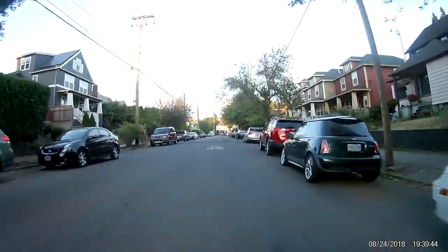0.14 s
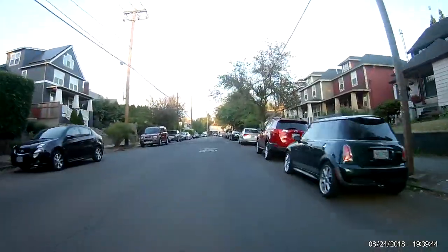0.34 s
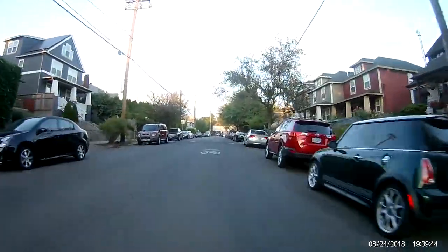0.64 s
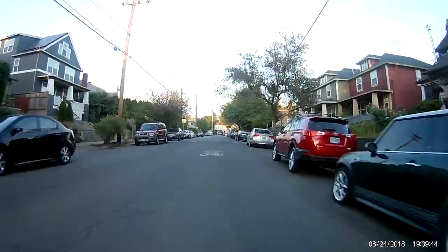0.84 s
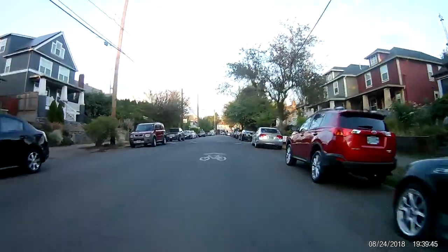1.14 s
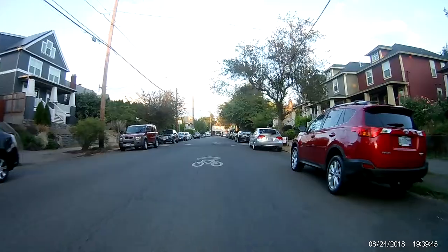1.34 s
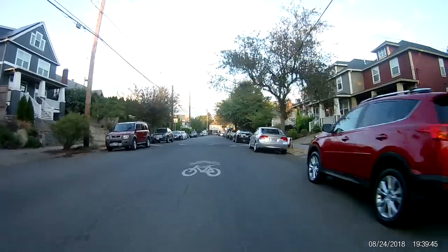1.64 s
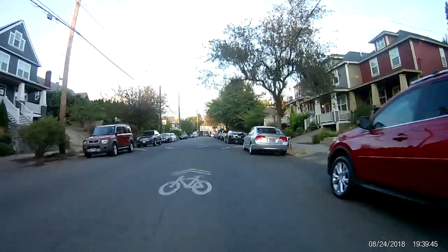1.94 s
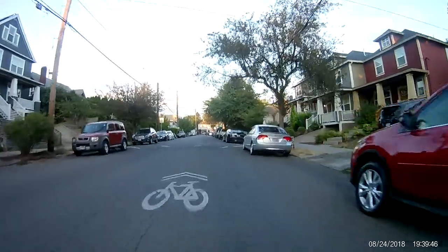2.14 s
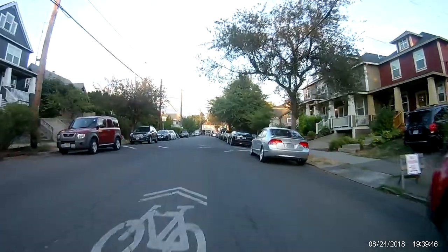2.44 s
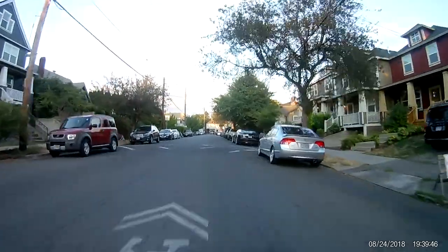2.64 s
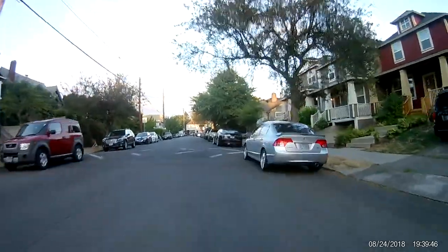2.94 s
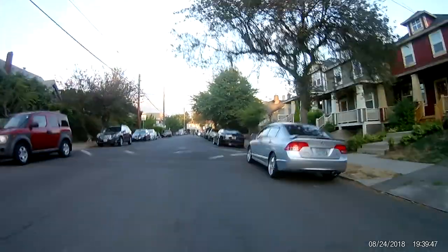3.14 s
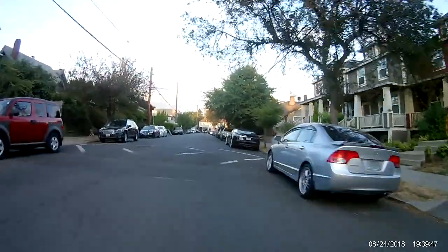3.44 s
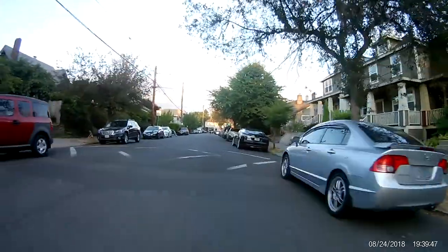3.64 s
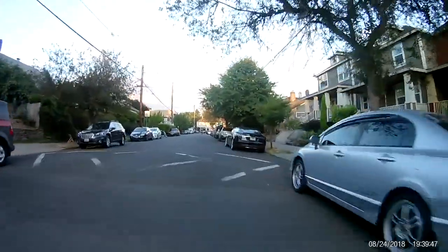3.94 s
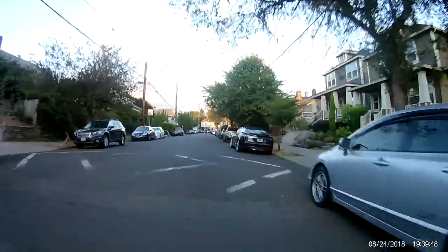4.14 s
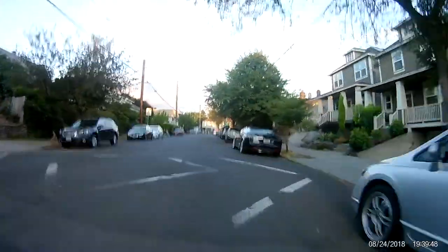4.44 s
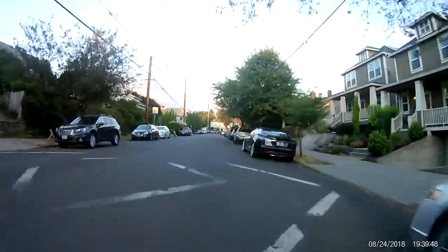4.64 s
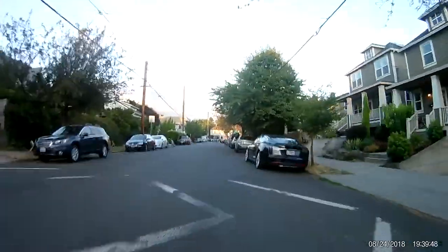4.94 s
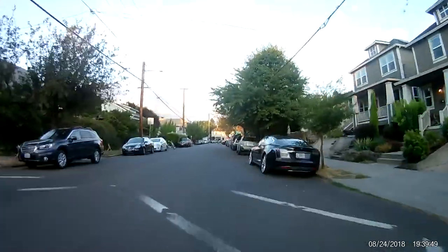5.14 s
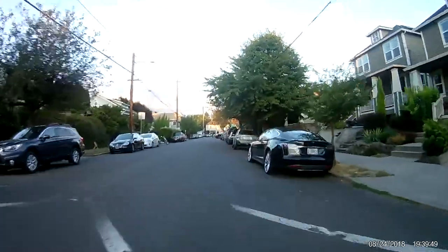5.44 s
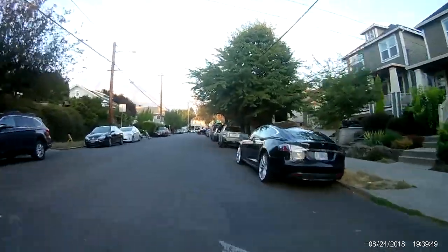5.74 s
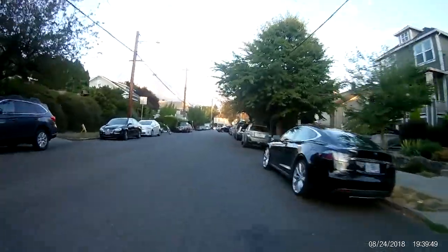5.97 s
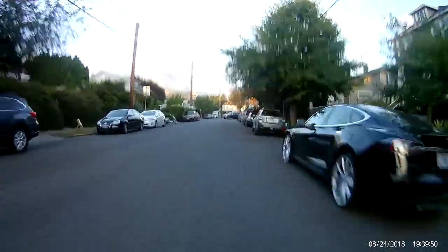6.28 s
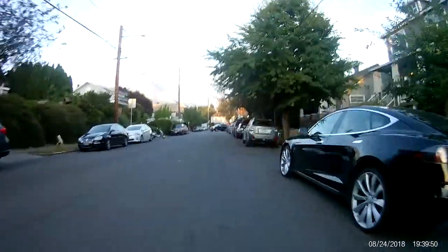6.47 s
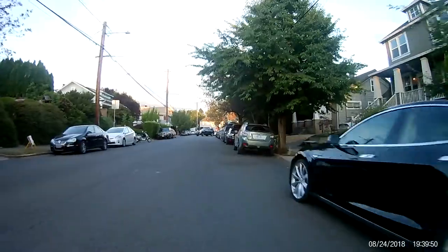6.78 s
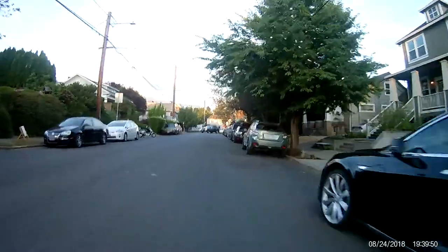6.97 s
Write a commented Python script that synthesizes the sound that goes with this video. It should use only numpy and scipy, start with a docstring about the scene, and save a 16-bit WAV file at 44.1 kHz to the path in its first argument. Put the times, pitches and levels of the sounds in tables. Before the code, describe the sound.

Steady low buzzing road rumble from a rolling bicycle, constant dry plastic chattering, louder midway, with sharp thumping cracks near the end.

```python
"""Asphalt drums on the tyres of a rolling bicycle: filtered noise hums in the frame and buzzes in a housing.
A camera sways on its resonant mount, and a loose part chatters unevenly, exciting the housing's decaying modes.
Fine grit crackles along the street and thickens to a scuff on three patches.
Three bumps jolt the mount with damped thumps and sharp noise-burst cracks; the first and last also crunch.
The last bump overloads the microphone, which rounds its peaks."""
import sys
import numpy as np
from scipy import signal
from scipy.fft import rfft, irfft, next_fast_len
from scipy.io import wavfile
from scipy.ndimage import uniform_filter1d

SR = 44100
rng = np.random.default_rng(int(sys.argv[2]) if len(sys.argv) > 2 else 0)


def generate_wav(sig):
    """Save sig (samples, or channels by samples) to the path in sys.argv[1] as 16-bit PCM at SR."""
    pcm = np.round(np.clip(np.atleast_2d(sig).T, -1, 1) * 32767).astype(np.int16)
    wavfile.write(sys.argv[1], SR, pcm)


N = 313551
T = np.arange(N) / SR  # seconds

TOP_HZ = 15800  # top of the whole sound's band
TREBLE_HZ = 7250  # top of the main band

# Impulses that throw the mount. Each row: start in seconds, signed push (relative), rise time constant in seconds.
JOLTS = [(4.465, .36, 0.0043), (4.4756, -0.79, 0.00079), (4.8937, -0.45, 0.0009), (6.339, 0.33, 0.0026),
         (6.352, .9, 0.0012), (6.3559, -0.67, 0.00025), (6.3591, -1.1, 0.00031), (6.373, .3, 0.00053),
         (6.39, -.25, 0.00057)]
# Spectrum of a hard contact. Each row: frequency in Hz, relative gain in dB.
CRACK = [(200, -3), (900, 6.5), (1400, 7), (2400, -1), (3200, 0), (4300, -5.5), (5100, -11.5), (5900, -22),
         (6700, -11), (7200, -18.5), (8000, -26), (9500, -27.5), (11800, -32.5), (13000, -51), (16000, -53)]


def undb(db):
    """Amplitude ratio from decibels: 20 dB is a factor of ten."""
    return 10 ** (np.asarray(db) / 20)


def unit(x):
    """Normalisation to a root-mean-square amplitude of 1."""
    return x / np.sqrt(np.mean(x ** 2))


def colour(x, points):
    """Minimum-phase filtering: folding the cepstrum makes a causal filter with the given (Hz, dB) outline."""
    hz, db = np.transpose(points)
    size = next_fast_len(2 * N)
    freq = np.maximum(np.fft.rfftfreq(size, 1 / SR), 1)
    gain_db = np.interp(np.log(freq), np.log(hz), db)
    cepstrum = irfft(np.log(undb(gain_db)), size)
    cepstrum[1:size // 2] *= 2
    cepstrum[size // 2 + 1:] = 0
    response = np.exp(rfft(cepstrum))
    return irfft(rfft(x, size) * response, size)[:N]


def lowpass(x, hz):
    """Band limiting: an elliptic filter cuts the treble steeply."""
    return signal.sosfilt(signal.ellip(8, .2, 70, hz, fs=SR, output="sos"), x)


def walk(rate):
    """Slow random modulation: `rate` random values a second, smoothed and scaled to rms 1."""
    k = max(int(SR / rate), 1)
    steps = np.repeat(rng.standard_normal(N // k + 1), k)
    return unit(uniform_filter1d(steps, k)[:N])


def add(track, s, sound):
    """Superposition: a sound is summed into the track at time s."""
    i = max(int(s * SR), 0)
    track[i:i + len(sound)] += sound[:max(N - i, 0)]


def burst(envelope):
    """Random impulse excitation: a unit-energy cluster of tiny contacts, each cluster a little different in colour."""
    evenness = .5  # 0 keeps the random spectrum, 1 flattens it
    spectrum = rfft(envelope * rng.standard_normal(len(envelope)))
    contacts = irfft(spectrum / np.abs(spectrum) ** evenness, len(envelope))
    # flattening spreads the energy in time, so the envelope is pressed on again
    contacts = contacts * (envelope / envelope.max()) ** .25
    return contacts / np.sqrt(np.sum(contacts ** 2))


def modes():
    """Modal decomposition: one decaying cosine a row for the plastic housing; their sum has unit energy."""
    # Each row: frequency in Hz, relative level in dB, 60 dB decay time in seconds.
    mode_table = [(1067, -1.5, 0.042), (1246.4, 1, 0.074), (1402, -4, 0.17), (1620, -6.5, 0.042),
                  (1680.3, 4, 0.075), (1921, -4.5, 0.077), (2046, -5, 0.096), (2255, -3, 0.018),
                  (2342, -14.5, 0.093), (2698, 2, 0.031), (2784, -3, 0.03), (3160, -16, 0.085),
                  (3253, -16, 0.067), (3806, -9, 0.04), (4086, -15.5, 0.032), (4270, -17.5, 0.021),
                  (4640, -18.5, 0.02), (4936, -15, 0.015), (5180, -14.5, 0.024), (5383, -13, 0.026),
                  (5680, -21.5, 0.018), (6070, -26.5, 0.014), (6620, -19, 0.024), (7070, -26.5, 0.013)]
    t = T[:SR // 6]
    rows = []
    for k, (hz, db, t60) in enumerate(mode_table):
        decay = np.exp(-np.log(1000) * t / t60)
        rows.append(undb(db) * np.cos(2 * np.pi * hz * t) * (-1) ** k * decay)
    rows = np.array(rows)
    return rows / np.sqrt(np.sum(rows.sum(0) ** 2))


def housing(force):
    """Linear response: the force is convolved with the housing's summed modes."""
    return signal.fftconvolve(force, modes().sum(0))[:N]


def rolling(frame_db, buzz_db, patchy_db=3.5, grain_db=2):
    """Broadband roughness excitation: asphalt grains make a hum, a rougher buzz and patches of thin gritty hiss."""
    # Spectra of the frame hum, housing buzz and grit hiss. Each row: frequency in Hz, relative gain in dB.
    hum_outline = [(60, -1.5), (140, -12.5), (210, 1), (250, -3), (300, 0), (380, -1.5), (470, 3.5),
                   (550, -2.5), (620, -15), (710, -27), (850, -19), (1100, -33.5), (2000, -66)]
    buzz_outline = [(600, -31.5), (890, -3), (990, -8.5), (1100, 2.5), (1250, -8.5), (1420, 3),
                    (1720, -0.5), (1830, -25.5), (2050, -6), (2550, -30.5), (2750, -13), (3500, -33.5),
                    (3820, -22.5), (4300, -58.5)]
    hiss_outline = [(2500, -8), (3500, -11), (3820, 14.5), (4100, -5), (4400, -4.5), (4680, 4),
                    (5000, -6.5), (5500, -13.5), (5850, -11), (6150, -9), (6400, -8.5), (6850, -3.5),
                    (7300, -20.5)]
    hum_gain_db, buzz_gain_db, hiss_gain_db = 1.5, -1, -32  # the hiss follows the buzz level
    hum = unit(colour(rng.standard_normal(N), hum_outline)) * undb(frame_db + hum_gain_db)
    grains = rng.standard_normal(N) * undb(1.3 * walk(110))
    buzz = unit(colour(grains, buzz_outline)) * undb(buzz_db + buzz_gain_db)
    hiss_db = buzz_db + hiss_gain_db + patchy_db * walk(7.5) + grain_db * walk(160)
    hiss = unit(colour(grains, hiss_outline)) * undb(hiss_db)
    return hum + buzz + hiss


def swing_level(patchy_db=1.27):
    """Forced and free oscillation: the swing in dB follows the road unevenly; a jolt dips it, then adds a decaying one."""
    # Swing driven by the road. Each row: time in seconds, relative level in dB.
    road_swing = [(0, -31.5), (.95, -30), (1.65, -34.5), (2.2, -26.5), (2.45, -33), (2.7, -26.5),
                  (3.2, -24.5), (3.28, -30.5), (3.5, -32.5), (3.86, -32), (3.96, -23.5), (4.08, -34.5),
                  (4.32, -20), (4.6, -25), (4.75, -25.5), (5.14, -20.5), (5.21, -29.5), (5.39, -30),
                  (5.7, -38), (5.85, -26), (6.06, -32.5), (6.25, -23.5), (6.57, -29.5), (7.11, -29.5)]
    after_db, after_s = -12, 0.035  # swing added by a push of 1, and its decay time constant
    road = undb(np.interp(T, *np.transpose(road_swing)) + patchy_db * walk(10))
    after = sum(abs(push) * (T > s) * np.exp(-np.abs(T - s) / after_s) for s, push, _ in JOLTS)
    # each dip is centred 4 ms after its jolt
    held = np.max([np.exp(-((T - s - .004) / .012) ** 2) for s, _, _ in JOLTS], axis=0)
    return 20 * np.log10(np.hypot(road, undb(after_db) * after)) - 18 * held


def mount_shake(shake_db, mount_hz=41, ring_db=-2, rumble_db=-32, follow=0.79):
    """Resonance: the mount swings near its own, wandering frequency over a steadier noise rumble."""
    # Spectrum of the rumble. Each row: frequency in Hz, relative gain in dB.
    rumble_outline = [(10, -23.5), (25, -7), (34, -0.5), (41, 1.5), (50, -5.5), (62, -7.5), (85, -13.5),
                      (125, -20.5), (200, -31.5), (500, -77.5)]
    shake_db = np.minimum(shake_db, -20)  # bigger swings are left to the jolts
    rumble = unit(colour(rng.standard_normal(N), rumble_outline))
    wandering_hz = mount_hz * (1 + 0.0594 * walk(10))
    ring = np.sqrt(2) * np.sin(2 * np.pi * np.cumsum(wandering_hz) / SR)
    rumble_level = undb(rumble_db + follow * (shake_db - np.median(shake_db)))
    return ring * undb(shake_db + ring_db) + rumble * rumble_level


def clatter(shake_db):
    """Amplitude-dependent contact: the joint's low-middle chatter grows 2 dB for each dB of swing, up to a cap."""
    # Spectrum of the chatter. Each row: frequency in Hz, relative gain in dB.
    clatter_outline = [(150, -20.5), (380, 7), (560, -10), (750, -1.5), (1100, -15), (2000, -32),
                       (5000, -48)]
    grains = rng.standard_normal(N) * undb(3.0 * walk(70))
    swing_db = np.minimum(shake_db, -16) + 18
    return unit(colour(grains, clatter_outline)) * undb(-35.5 + 2 * swing_db)


def loose_grit(stray_db=-60):
    """Random impulse process: sparse grains crackle all along the street; dense noise scuffs on each patch."""
    # Patches of grit. Each row: middle in seconds, length (two standard deviations) in seconds, level in dB.
    patch_table = [(4.36, 0.14, -64), (5.76, 0.16, -49.5), (6.81, .09, -49.5)]
    # Spectrum of the grit. Each row: frequency in Hz, relative gain in dB.
    grit_outline = [(500, -14.5), (900, -2.5), (1600, 6.5), (2100, 2.5), (2500, 0), (3000, -5),
                    (3900, -7.5), (4700, -14.5), (5600, -24), (6800, -21), (7300, -26)]
    struck = rng.random(N) < 500 / SR  # on average 500 grains a second
    signs = rng.choice([-1, 1], N)
    sizes = undb(3 * np.minimum(rng.exponential(size=N), 5))
    strays = struck * signs * sizes
    dense = rng.standard_normal(N) * undb(4.5 * walk(300))
    patches = sum(undb(db) * np.exp(-2 * ((T - s) / length) ** 2) for s, length, db in patch_table)
    return undb(stray_db) * unit(colour(strays, grit_outline)) + patches * unit(colour(dense, grit_outline))


def bounces():
    """Ballistic flight and rebound: (s, dB) of each contact; a strike clears the part, then faint bounces fill the lull."""
    # Strikes of the loose part. Each row: start in seconds, relative strength in dB.
    strike_table = [(0.0073, -33.5), (0.045, -33.0), (0.0899, -31), (0.1126, -32), (0.1571, -31.5),
                    (0.199, -29.5), (0.233, -29.5), (0.282, -28.5), (0.3204, -30), (0.3613, -31),
                    (0.408, -30), (0.455, -27.5), (0.4994, -28), (0.5364, -26), (0.5926, -29.5),
                    (0.656, -27.5), (0.71, -29.5), (0.7471, -31), (0.812, -33.5), (0.879, -34),
                    (0.9223, -31), (0.9552, -34), (0.9949, -27.5), (1.0433, -33), (1.0796, -32.5),
                    (1.1493, -33.5), (1.196, -35), (1.231, -36), (1.29, -44), (1.3596, -36.0),
                    (1.4131, -25.5), (1.4664, -23.5), (1.5043, -29), (1.546, -32.5), (1.592, -31.5),
                    (1.629, -32.5), (1.6736, -32.5), (1.877, -41), (1.9187, -37.5), (1.9531, -32),
                    (1.9937, -35.5), (2.035, -27), (2.0894, -28), (2.128, -30), (2.153, -38),
                    (2.187, -36.5), (2.2253, -26.5), (2.2703, -26.5), (2.306, -31.5), (2.3421, -33),
                    (2.401, -38.5), (2.48, -34), (2.57, -34), (2.613, -36), (2.6437, -32.5),
                    (2.6875, -31.5), (2.729, -29.5), (2.7663, -27), (2.8045, -28.5), (2.8435, -28.5),
                    (2.886, -34.5), (2.9212, -26.5), (2.9788, -26.5), (3.037, -24.5), (3.0836, -29),
                    (3.111, -33.5), (3.1476, -34.5), (3.1893, -37.5), (3.3302, -37), (3.455, -44),
                    (3.6467, -35.5), (3.6723, -34), (3.7347, -25.5), (3.791, -25.5), (3.8447, -27),
                    (3.872, -30.5), (3.9508, -30.5), (3.984, -35), (4.023, -30.5), (4.0687, -32),
                    (4.1014, -37), (4.1373, -32), (4.185, -25), (4.229, -29.5), (4.2679, -32.5),
                    (4.298, -36.5), (4.339, -31), (4.3696, -40), (4.413, -32.0), (4.46, -22), (4.5404, -20),
                    (4.615, -27), (4.695, -24), (4.733, -37), (4.78, -19), (4.8473, -21.5), (4.9539, -19),
                    (5.0338, -20.5), (5.1062, -19.5), (5.1613, -40.0), (5.1842, -23), (5.255, -30.5),
                    (5.3118, -29), (5.408, -45), (5.5441, -38), (5.5841, -36), (5.6246, -36),
                    (5.697, -35.5), (5.959, -42.5), (5.996, -39.5), (6.032, -37.5), (6.1902, -28.5),
                    (6.242, -30), (6.3029, -29.5), (6.4242, -28.5), (6.49, -30.5), (6.573, -28),
                    (6.6168, -32.5), (6.6712, -28.5), (6.729, -36), (6.91, -38), (6.9576, -33.5),
                    (7.007, -34), (7.064, -35.5)]
    rest_db, scatter_db = -51, 4  # relative strength of the faint bounces, and its spread
    bounce_s, jitter = .047, .25  # nominal spacing, and timing scatter as a share of the spacing
    flight_s = .26  # extra time in the air per unit of strike amplitude
    contacts = list(strike_table)
    for (s, db), (until, _) in zip(strike_table, strike_table[1:]):
        start = s + flight_s * undb(db)
        lull = until - start
        count = int(lull / bounce_s + 1 / 3)
        for k in range(1, count):
            early, soft = rng.standard_normal(2)
            contacts.append((start + lull * (k - jitter * early) / count, rest_db - scatter_db * soft))
    return contacts


def rattle(lead=.0006, frame_hz=381, frame_db=-18.0):
    """Modal excitation by impact: each contact skitters at a new spot; chatter and frame ring grow faster with strength."""
    rise_s, skitter_s = .0008, .0025  # time constants; each contact stretches the second at random
    mode_spread_db = 1.7  # spread of each mode's share from contact to contact
    out, force = np.zeros(N), np.zeros(N)
    t, rows = T[:SR // 8], modes()
    chatter = (1 - np.exp(-t / 0.0015)) * np.exp(-t / 0.021)
    # the later contacts are softer, so they reach only the lower modes
    soften = signal.butter(5, 2350, fs=SR, output="sos")
    for s, db in bounces():
        decay = skitter_s * 2 ** rng.uniform(-0.15, 0.93)
        skitter = (1 - np.exp(-t / rise_s)) * np.exp(-t / decay)
        hard = undb(1.42 * (db + 20.5))
        first = undb(db + 25.0) * burst(skitter)
        later = hard * undb(2.5) * signal.sosfilt(soften, burst(chatter))
        spot = undb(mode_spread_db * rng.standard_normal(len(rows)))
        add(force, s - lead, first)
        add(out, s - lead, signal.fftconvolve(first + later, unit(spot) @ rows))
        ring_hz = frame_hz * (1 + 0.029 * rng.standard_normal())
        ring = np.sin(2 * np.pi * ring_hz * t) * (1 - np.exp(-t / 0.015)) * np.exp(-t / 0.027)
        add(out, s, hard * undb(frame_db) * ring)
    return out + undb(-20) * colour(force, CRACK)


def grinding(attack=.001, release=0.0013, edge_db=-4):
    """Stick-slip friction: the joint slips under a bump's load in a dense, rough noise crunch."""
    # Loads on the joint. Each row: start in seconds, length in seconds, level in dB, relative treble level in dB.
    grind_table = [(4.453, 0.02, -23, -14), (4.474, 0.014, -30, -10), (6.342, 0.021, -23.5, -2.5),
                   (6.365, 0.0068, -23, -4)]
    # Spectra of the crunch's body and treble edge. Each row: frequency in Hz, relative gain in dB.
    body_outline = [(150, -8), (450, 3.5), (700, 0.5), (950, -4.5), (1400, 2), (1650, 10.5), (1850, -16),
                    (2100, 2.5), (2400, -18.5), (2700, -17), (4000, -25), (7000, -50)]
    edge_outline = [(1500, -14), (2400, -6), (2750, 7), (3100, 3.5), (3800, -8), (4300, -4.5), (4650, -11),
                    (5200, -16), (5900, -14), (6700, -18.5), (7300, -19)]
    slips = rng.standard_normal(N) * undb(4 * walk(1200))
    body = unit(colour(slips, body_outline))
    edge = unit(colour(slips, edge_outline))
    out, t = np.zeros(N), T[:SR // 10]
    for s, length, db, treble_db in grind_table:
        load = (1 - np.exp(-t / attack)) * np.exp(-np.maximum(t - length, 0) / release)
        part = slice(int(s * SR), int(s * SR) + len(t))
        crunch = body[part] + undb(edge_db + treble_db) * edge[part]
        add(out, s, undb(db) * load * crunch)
    return out


def knocks():
    """Impact at a stop: a dry crack, brighter the harder it is, with two short damped rings and the housing's modes."""
    # Knocks of the mount. Each row: start in seconds, relative level in dB, first ring in Hz,
    # its level in dB relative to the knock, second ring in Hz, its level likewise, crack decay constant in seconds.
    knock_table = [(4.4568, -43.5, 1410, 30, 3000, 26, .0013), (4.4645, -38.5, 1510, 20, 2380, 11, .0022),
                   (4.4738, -28, 696, 20, 3830, 6, 0.00072), (4.4894, -49, 497, 30, 300, 24, 0.0037),
                   (4.8923, -16.5, 430, 5, 1150, -1, 0.0011), (5.128, -40, 420, 3, 1400, 9, .0014),
                   (5.145, -50, 690, 16, 850, 17, 0.0041), (6.3373, -19.5, 1300, 15, 400, 15, 0.0012),
                   (6.3375, -30, 3120, 13, 4340, 8, .0008), (6.3526, -15.5, 3300, -3, 4150, 2.5, 0.00064),
                   (6.3557, -17, 690, 16.5, 1420, 15.5, 0.0011),
                   (6.3694, -19.5, 1430, 10.5, 3000, -1, 0.0012),
                   (6.3852, -19.5, 1950, -3, 4130, -4, 0.00076)]
    # treble edge of a -15 dB knock before the limits below, and the dB of strength that shift it by an octave
    edge_hz, db_per_octave = 20300, 11
    cracks, rings, t = np.zeros(N), np.zeros(N), T[:SR // 25]
    for s, db, first_hz, first_db, second_hz, second_db, decay in knock_table:
        edge = np.clip(edge_hz * 2 ** ((db + 15) / db_per_octave), TREBLE_HZ, TOP_HZ)
        crack = lowpass(burst(np.exp(-t / decay)), edge)
        # a longer crack carries more energy
        add(cracks, s, undb(db + 13.5) * np.sqrt(decay * SR / 2) * crack)
        for hz, ring_db, longer in (first_hz, first_db, 2.55), (second_hz, second_db, 1.7):
            envelope = (1 - np.exp(-t / 0.000077)) * np.exp(-t / (longer * decay))
            add(rings, s, undb(db + ring_db) * envelope * np.sin(2 * np.pi * hz * t))
    return colour(cracks, CRACK) + undb(-15) * housing(cracks) + lowpass(rings, TREBLE_HZ)


def jolts(swing_hz=31, decay=0.011):
    """Damped free oscillation: a bump throws the camera, and its swing dies within a cycle or two."""
    out, t = np.zeros(N), T[:SR // 5]
    for s, push, rise in JOLTS:
        envelope = (1 - np.exp(-t / rise)) * np.exp(-t / decay)
        add(out, s, push * envelope * np.cos(2 * np.pi * swing_hz * t))
    return out


def scene():
    """Band limiting: the high treble of all sounds but the knocks is cut."""
    # The asphalt. Each row: time in seconds, relative frame hum level in dB, relative housing buzz level in dB.
    road_table = [(0.0, -33.5, -35), (1.42, -32.5, -36.5), (2.08, -34.5, -36), (2.49, -34.5, -37.5),
                  (2.91, -34, -37), (3.23, -34.5, -38), (4.16, -34.5, -37), (5.07, -34, -35.5),
                  (5.35, -35.5, -38.5), (6.04, -36, -38.5), (6.52, -32, -34.5), (7.11, -35, -37)]
    shake_db = swing_level()
    s, frame_points, buzz_points = np.transpose(road_table)
    frame_db, buzz_db = np.interp(T, s, frame_points), np.interp(T, s, buzz_points)
    main = rolling(frame_db, buzz_db) + mount_shake(shake_db) + clatter(shake_db) + loose_grit()
    main = main + rattle() + grinding() + jolts()
    return (lowpass(main, TREBLE_HZ) + knocks())[None]


def record(dry):
    """Saturation and band limiting: peaks are rounded, the recorder leaves a notch near 8 kHz, hiss joins, the top is cut."""
    hiss = undb(-82.5) * rng.standard_normal(dry.shape)
    rounded = dry / (1 + dry ** 6) ** (1 / 6)
    notch = signal.butter(3, (7450, 8450), "bandstop", fs=SR, output="sos")
    return lowpass(signal.sosfilt(notch, rounded) + hiss, TOP_HZ)


dry = scene()
out = record(dry)
generate_wav(out)
```